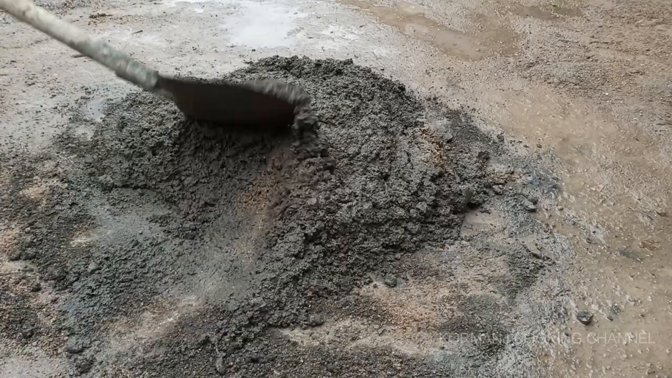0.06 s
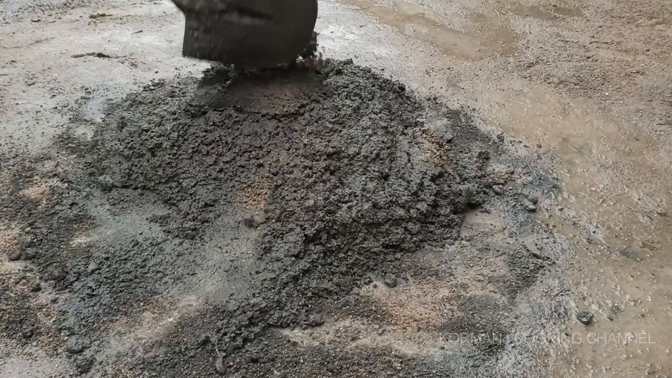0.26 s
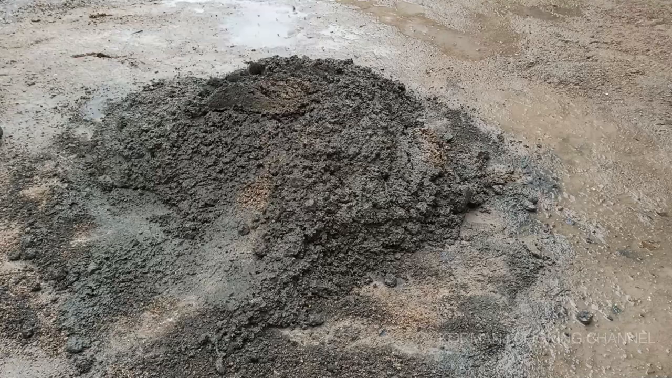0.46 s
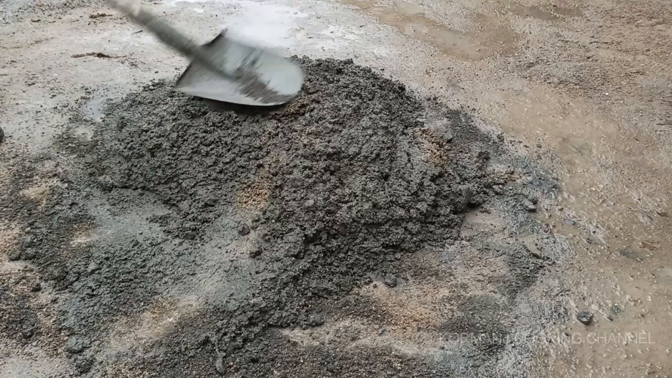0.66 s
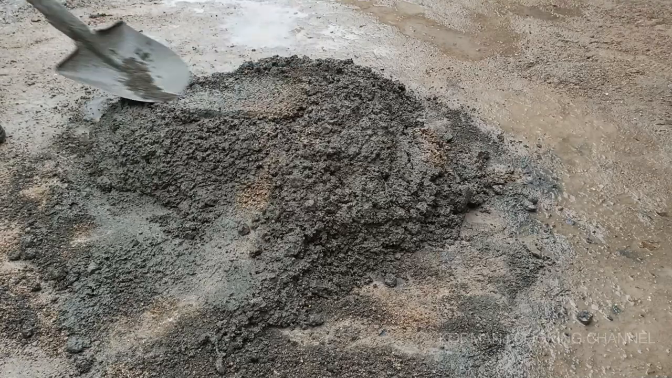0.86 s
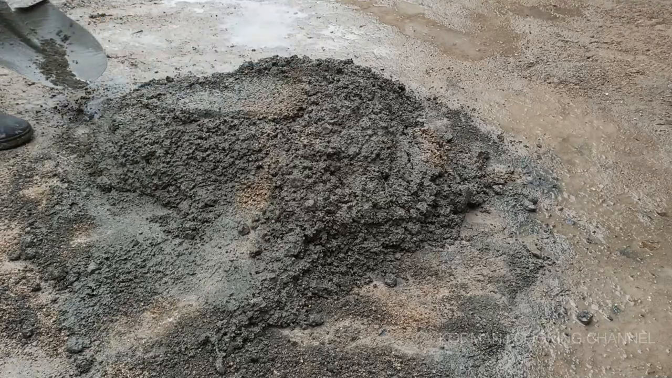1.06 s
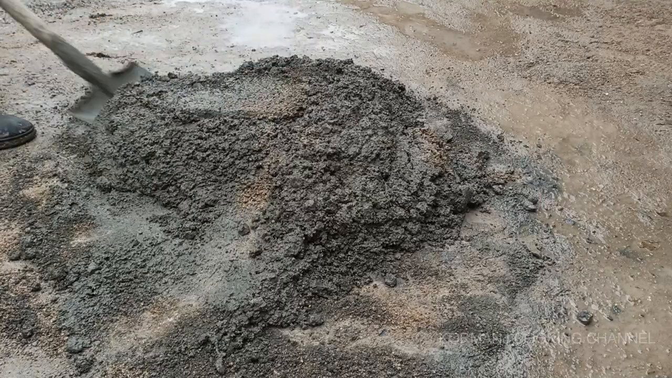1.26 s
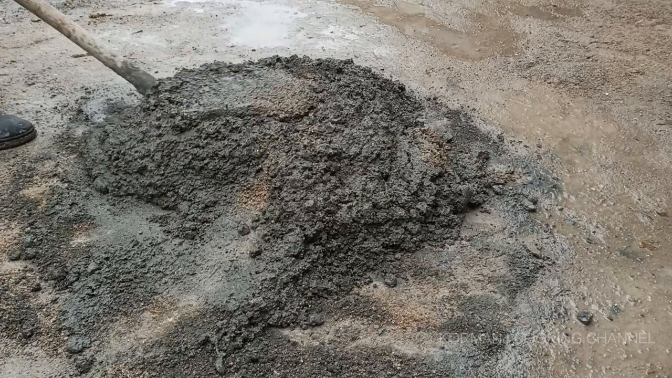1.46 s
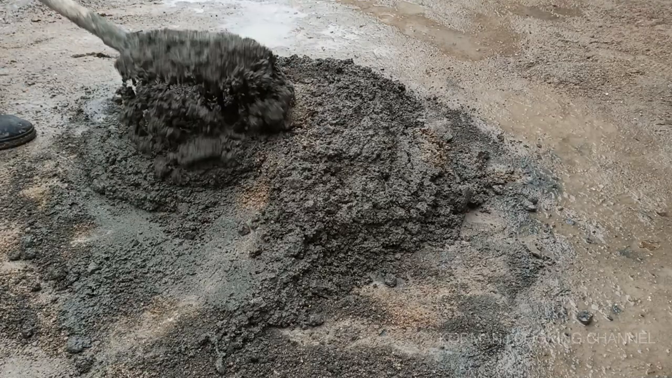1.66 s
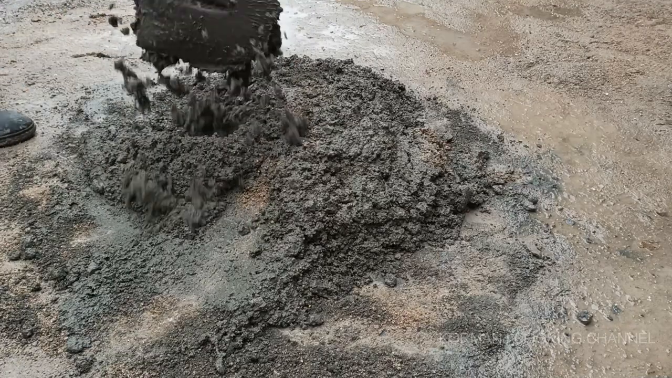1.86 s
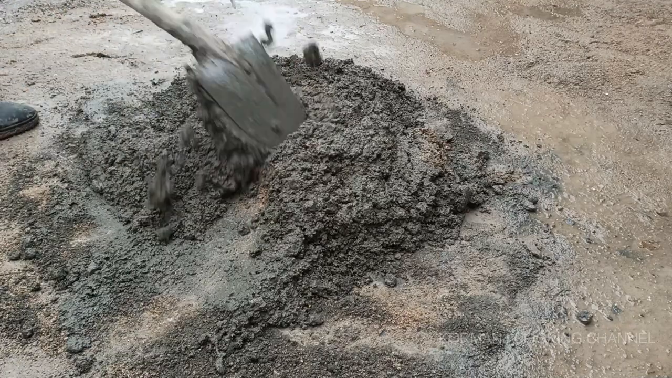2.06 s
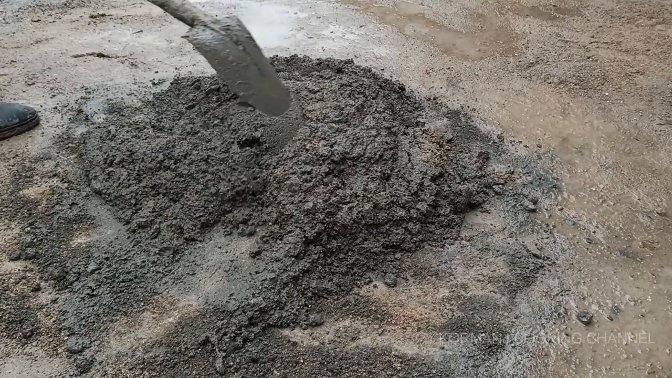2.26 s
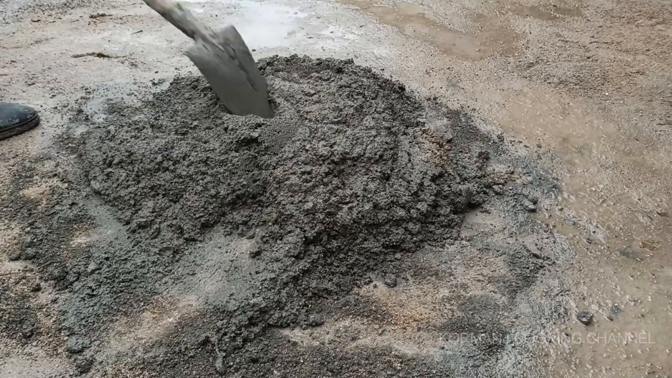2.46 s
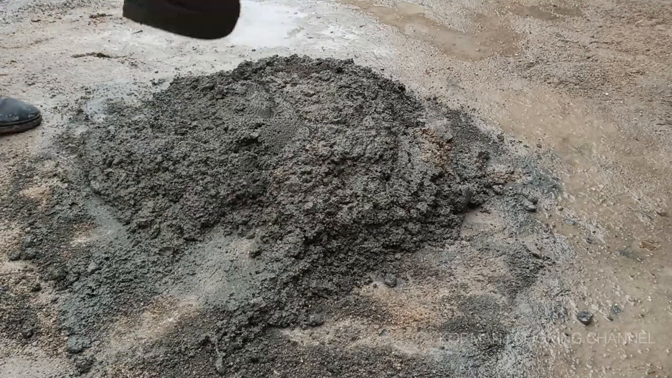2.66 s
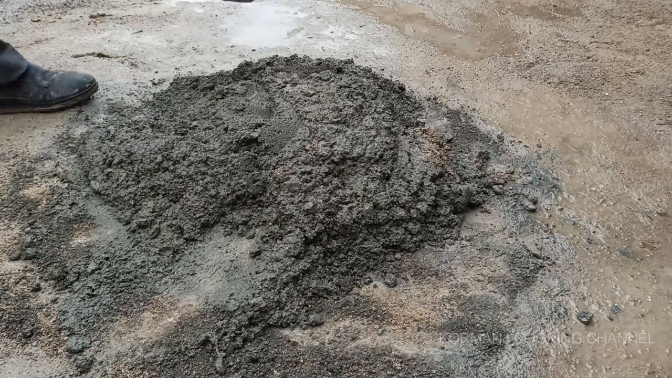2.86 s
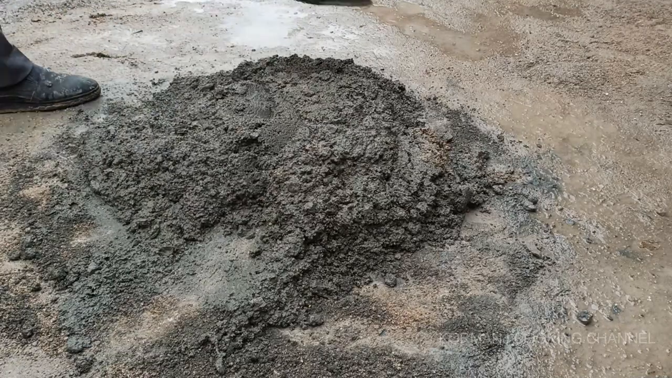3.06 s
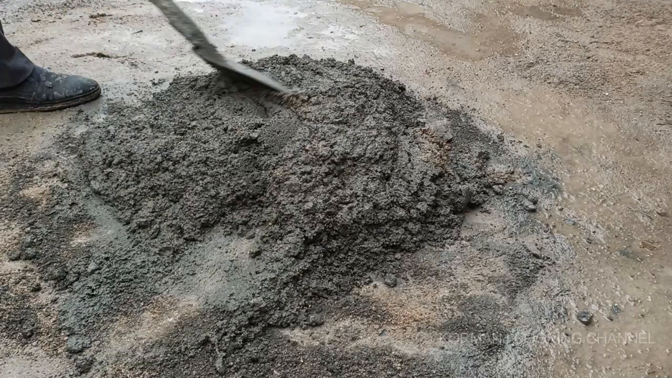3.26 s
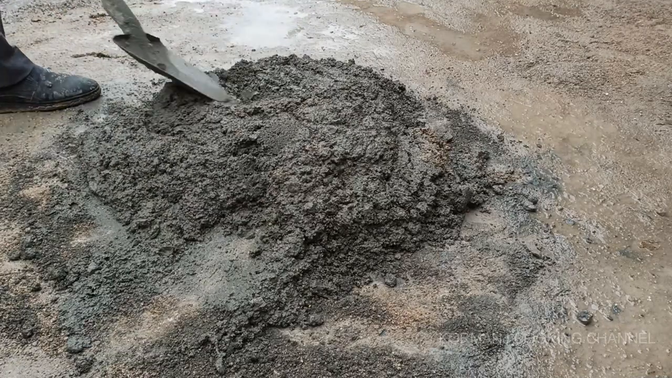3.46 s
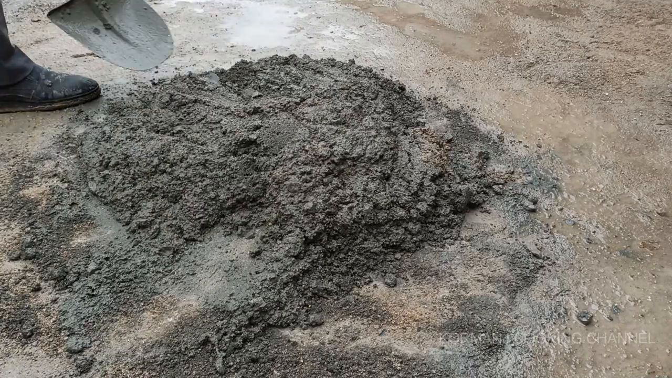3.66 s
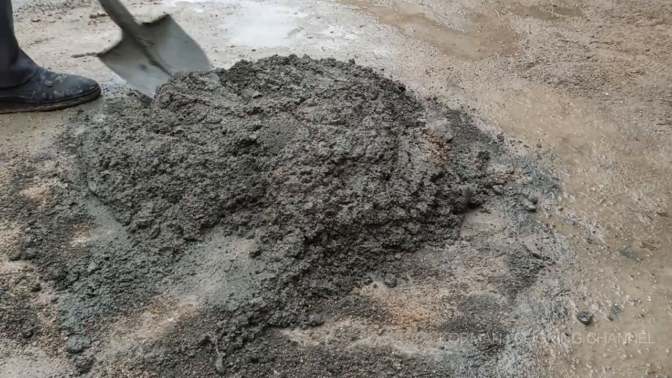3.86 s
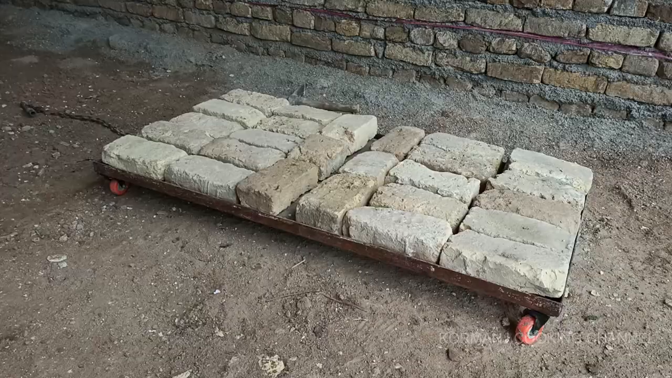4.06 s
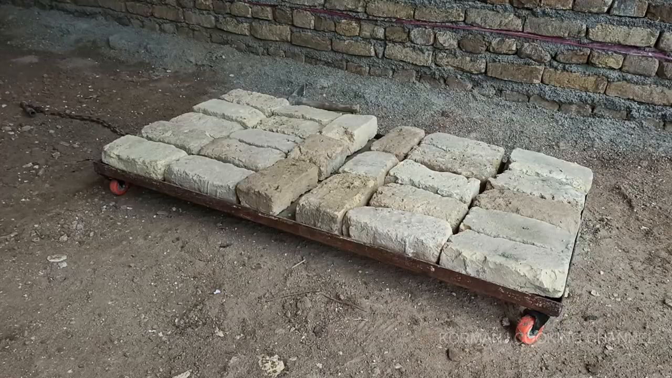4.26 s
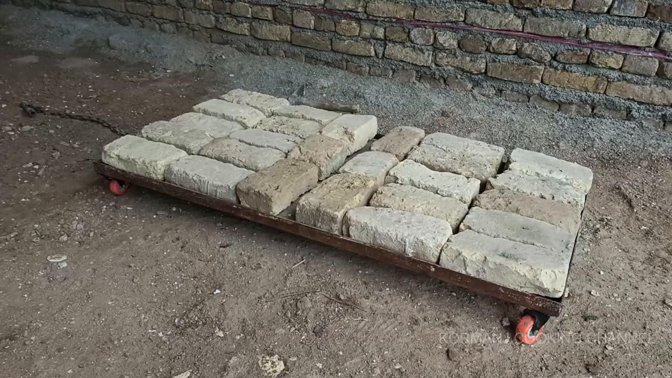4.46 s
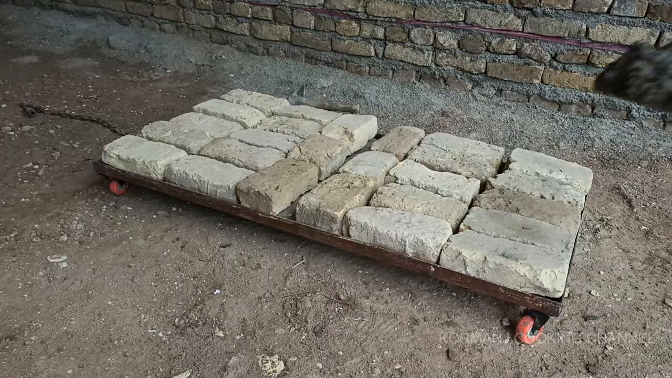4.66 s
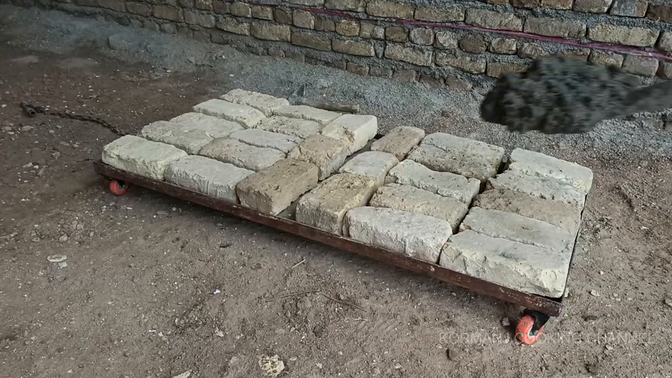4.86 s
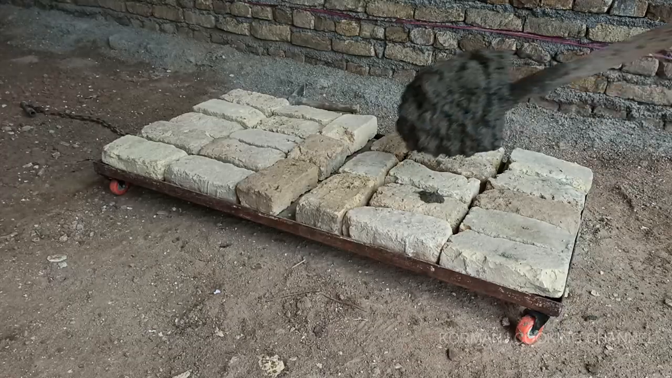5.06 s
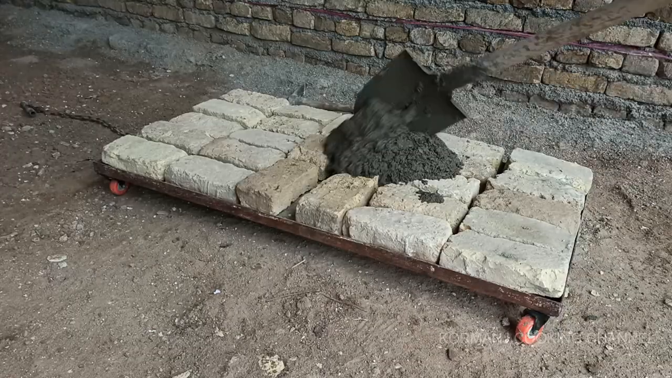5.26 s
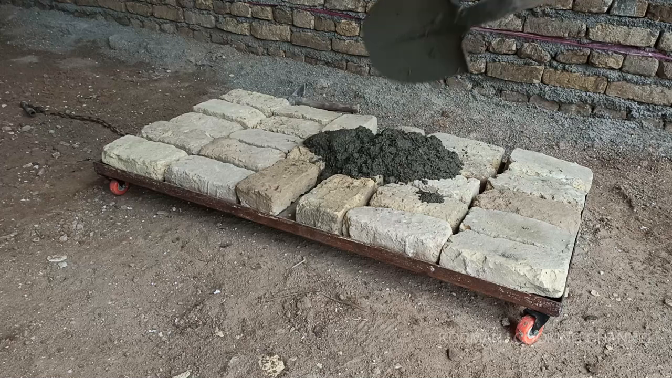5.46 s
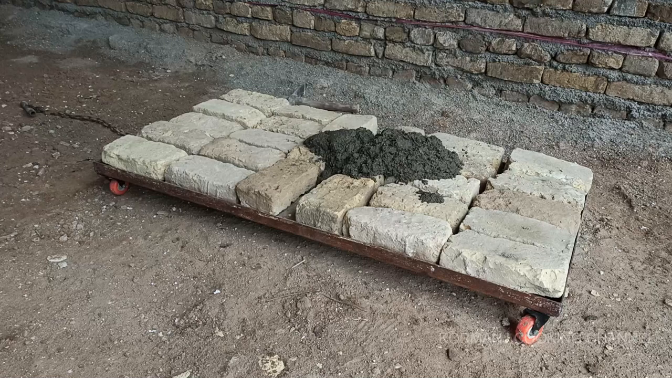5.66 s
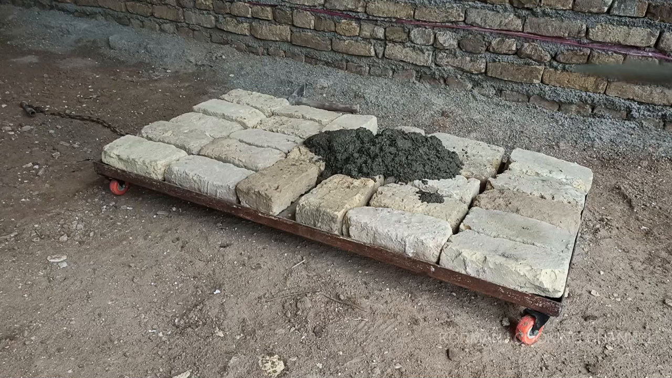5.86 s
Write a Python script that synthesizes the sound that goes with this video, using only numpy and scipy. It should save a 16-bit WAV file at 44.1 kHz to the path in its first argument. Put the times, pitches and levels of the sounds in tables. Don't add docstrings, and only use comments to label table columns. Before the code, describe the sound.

Outdoors in an open yard, a steel shovel works wet concrete close to a stereo microphone: faint shedding grit, a sharp pat, a heavy crunching scoop, softer pouring and chopping, a hard slap and a rough deep dig. The scene cuts to a brick wall, where a stone clacks and the load plops down over a faint unsteady hum.

```python
import sys
import numpy as np
from scipy import signal
from scipy.fft import rfft, irfft, next_fast_len
from scipy.io import wavfile
from scipy.ndimage import uniform_filter1d, map_coordinates

SR = 44100
rng = np.random.default_rng(int(sys.argv[2]) if len(sys.argv) > 2 else 0)


def dump(signal):
    limited = np.clip(np.atleast_2d(signal).T, -1, 1)
    pcm = np.round(limited * 32767).astype(np.int16)
    wavfile.write(sys.argv[1], SR, pcm)


def gain_from_decibels(decibels):
    exponent = np.asarray(decibels, float) / 20
    return 10 ** exponent


N = 261072
TOP_HZ = 15800


def unit(x):
    return x / np.sqrt(np.mean(x ** 2) + 1e-20)


def along(points, hz):
    f, v = np.transpose(points)
    return np.interp(np.log(hz + 1), np.log(f + 1), v)


def curves(rows, t):
    s, *cols = np.transpose(rows)
    return [np.interp(t, s, c) for c in cols]


def wobble(rate):
    knots = rng.standard_normal(int(N * rate / SR) + 4)
    return map_coordinates(knots, [np.arange(N) * rate / SR])


def noise():
    return rng.standard_normal((2, N))


def filtered(x, response):
    m = next_fast_len(N + SR // 2)
    return irfft(rfft(x, m) * response(np.fft.rfftfreq(m, 1 / SR)), m)[..., :N]


def coloured(points):
    return lambda f: gain_from_decibels(along(points, f))


def modes(table):
    def response(f):
        return sum((-1) ** k * gain_from_decibels(db) * 1j * f * w / (c * c - f * f + 1j * f * w)
                   for k, (c, w, db) in enumerate(table))
    return response


# frequency in Hz, level in dB per Hz.
YARD_COLOUR = [(20, -42), (40, -23), (70, -7.5), (150, -3), (400, -4), (1000, -17.5), (3000, -24),
               (8000, -18), (16000, -18.5)]
# time in seconds, level in dB.
AIR = [(0, -48.5), (1, -48), (2, -45.5), (2.8, -51.5), (3.6, -49.5), (4.3, -49), (5, -52), (5.92, -49)]
# frequency in Hz, width in Hz, level in dB.
HUM = [(94.9, 3.2, -62), (205, 4.2, -61.5), (297.8, 14.5, -53.5)]


def yard():
    wall_s = 4.13
    air_db = curves(AIR, np.arange(N) / SR)[0] + 0.53 * wobble(2.0)
    air = gain_from_decibels(air_db) * unit(filtered(noise(), coloured(YARD_COLOUR)))
    hum = sum(gain_from_decibels(db) * unit(filtered(noise(), modes([(hz, width, 0)]))) for hz, width, db in HUM)
    hum = filtered(hum, lambda f: f ** 2 / (f ** 2 + 60 ** 2))
    return air + (np.arange(N) > wall_s * SR) * hum


# start in seconds, peak in dB.
SNAPS = [(0.4324, -47), (0.691, -58), (1.111, -52), (2.8265, -49), (3.0744, -50), (3.5623, -54),
         (3.795, -48), (3.8447, -52), (4.322, -52), (4.5376, -56), (5.691, -52)]


def snaps():
    treble_hz, t60_s = 5000, 0.0088
    out, t = np.zeros((2, N + SR)), np.arange(SR // 50) / SR
    for s, db in SNAPS:
        burst = gain_from_decibels(db + 23 - 60 * t / t60_s) * rng.standard_normal((2, len(t)))
        out[:, round(s * SR):][:, :len(t)] += burst
    return filtered(out[:, :N], lambda f: (1j * f / (treble_hz + 1j * f)) ** 2)


# start in seconds, length in seconds, pitch in Hz, level in dB.
SQUEAKS = [
    (2.599, 0.045, 1645, -46.5),
    (2.603, 0.057, 1090, -52),
    (3.11, 0.057, 4770, -62),
    (3.156, 0.09, 730, -49.5),
]


def squeaks():
    t, out = np.arange(N) / SR, np.zeros(N)
    for s, span, hz, db in SQUEAKS:
        edge = np.clip(np.minimum(t - s, s + span - t) / 0.0091, 0, 1)
        out += gain_from_decibels(db) * edge * np.sin(2 * np.pi * hz * t)
    return out


# start in seconds,
# peak in dB, pitch in Hz, t60 in seconds.
POPS = [(1.119, -29, 1010, 0.026), (1.908, -34, 205, 0.11), (2.126, -22.5, 194, 0.052),
        (2.74, -43, 924, 0.087), (3.741, -22, 1260, 0.023), (3.743, -29, 930, 0.034),
        (4.509, -26, 867, 0.068), (4.535, -35, 962, 0.076), (5.149, -42, 810, 0.097),
        (5.2595, -12, 205, 0.035), (4.2, -31, 338, .05), (4.262, -25, 312, 0.055), (4.674, -28, 298, 0.051),
        (4.77, -22, 188, 0.04)]


def pops():
    rise_s = .003
    out, t = np.zeros(N + SR), np.arange(SR // 5) / SR
    for s, db, hz, t60 in POPS:
        phase = 2 * np.pi * hz * (t + 0.0094 * t * t / t60)
        swell = gain_from_decibels(db - 2.0 - 60 * t / t60) * (1 - np.exp(-t / rise_s))
        out[round(s * SR):][:len(t)] += swell * np.sin(phase)
    return out[:N] * np.array([[1], [0]])


# start in seconds, peak in dB, pitch in Hz, t60 in seconds.
TICKS = [(0.7531, -11, 1060, 0.0031), (2.125, -19, 4370, 0.004), (2.4464, -16.5, 1530, 0.0076),
         (2.828, -30, 5140, 0.0045), (3.0756, -31, 3430, 0.0058), (3.101, -29.5, 1560, 0.0032),
         (3.2542, -11, 2820, 0.0095), (3.251, -20, 1000, 0.014), (3.7938, -50, 4400, 0.0028),
         (3.9513, -14, 3670, 0.0049), (4.4934, -32.5, 1870, 0.0077), (4.7912, -21, 4370, 0.0036),
         (5.2265, -17, 2500, 0.004), (5.2597, -12, 2400, 0.01), (5.3409, -20, 2770, 0.0034),
         (5.2092, -21, 900, .004), (1.1783, -21, 5000, .002), (1.1785, -30, 600, .006),
         (1.221, -27, 6500, .002), (4.7265, -24, 1900, .012), (4.791, -30, 1900, .004),
         (3.2325, -8, 4600, .008), (3.2535, -14, 4200, .008), (3.892, -10, 3500, .01),
         (3.921, -12, 3600, .01), (2.388, -20, 1100, .006), (2.424, -18, 4500, .004),
         (.7445, -18, 2500, .008), (5.399, -15.5, 1870, 0.0061)]
# start in seconds, peak in dB, pitch in Hz, t60 in seconds.
CLACK = [
    (4.7125, -10, 2700, .0035),
    (4.7126, -18, 6300, .003),
    (4.7145, -26, 3400, .01),
    (4.7155, -22, 2000, .012),
    (4.7172, -20, 1000, .008),
]


def ticks():
    out, t = np.zeros(N + SR), np.arange(SR // 50) / SR
    for s, db, hz, t60 in TICKS + CLACK:
        decay = gain_from_decibels(db + 2.5 - 60 * t / max(t60, .001))
        out[round(s * SR):][:len(t)] += decay * np.sin(2 * np.pi * hz * t)
    thin = filtered(out[:N], lambda f: 1j * f / (400 + 1j * f))
    return thin * np.array([[1], [.4]])


# peak time in seconds, level in dB, pitch in Hz,
# length in seconds.
LUMPS = [(1.271, -19, 1432, .011), (1.297, -23, 818, .025), (1.335, -16, 683, .055), (1.385, -27, 105, .08),
         (1.435, -27, 120, .05), (1.359, -19, 560, .025), (1.369, -20, 183, .035), (1.371, -24, 732, .035),
         (1.399, -17, 571, .03), (1.405, -19, 463, .04), (1.405, -21, 764, .03), (1.405, -21, 1184, .03),
         (1.433, -22, 754, .015), (1.433, -25, 1130, .02), (1.439, -15, 431, .024), (1.437, -24, 170, .035),
         (1.458, -22, 388, .04), (1.47, -26, 180, .03), (1.495, -28, 380, .035), (4.112, -33, 180, .04)]
# peak time in seconds, level in dB, pitch in Hz, length in seconds.
CLODS = [(3.893, -23, 409, .015), (3.898, -21, 1733, .026), (3.897, -22, 1389, .015),
         (3.901, -23, 1152, .03), (3.909, -20, 1669, .015), (3.925, -23, 549, .015),
         (3.925, -27, 1109, .04), (3.951, -19, 312, .02), (3.951, -16, 560, .022), (3.95, -18, 743, .035),
         (3.972, -27, 807, .05), (3.971, -24, 538, .04), (3.993, -23, 721, .03), (3.993, -20, 894, .015),
         (3.999, -19, 194, .04), (3.999, -25, 549, .03), (4.017, -27, 678, .04), (4.04, -24, 560, .03),
         (4.055, -24, 183, .05), (4.056, -20, 517, .03), (4.056, -25, 330, .02), (4.056, -27, 760, .02)]
# peak time in seconds, level in dB, pitch in Hz, length in seconds.
KNOCKS = [(0.744, -24, 1626, 0.015), (0.748, -29, 1432, 0.015), (0.752, -27, 721, 0.015),
          (0.752, -31, 904, 0.035), (0.756, -27, 1055, 0.015), (2.125, -31, 1712, 0.015),
          (2.43, -31, 1206, 0.039), (2.442, -28, 1475, 0.015), (2.444, -29, 1292, 0.025),
          (2.444, -28, 1647, 0.035), (3.239, -29, 1604, 0.035), (3.245, -26, 1184, 0.025),
          (3.253, -22, 840, 0.02), (3.253, -23, 1001, 0.015)]


def lumps():
    swell_db, rough_db = -1, 2.5
    out = np.zeros(N)
    for s, db, hz, span in LUMPS + CLODS + KNOCKS:
        count = round(span * SR)
        tone = np.sin(2 * np.pi * hz * np.arange(count) / SR)
        out[round((s - span / 2) * SR):][:count] += gain_from_decibels(db + swell_db) * np.hanning(count) * tone
    return out * gain_from_decibels(rough_db * wobble(140)) * np.array([[1], [.5]])


# start in seconds, peak in
# dB, centre in Hz.
HITS = [(0.1595, -24, 3020), (0.4315, -34, 6510),  (0.7397, -12, 6560), (1.1786, -29.5, 6690),
        (1.2192, -29, 7440), (1.27, -2.5, 6700), (1.9848, -21.5, 7110), (2.5357, -26, 7420),
        (2.9587, -23.5, 6900), (3.2041, -33, 4000), (3.2305, 3, 7000), (3.563, -32, 7100),
        (3.7943, -51, 6900), (3.8889, -0.5, 3600), (3.9953, -1.5, 6400), (4.0332, -5.5, 6750),
        (4.0577, -16, 6770), (4.2614, -38, 6700), (4.3216, -55, 6690), (4.338, -35.5, 6710),
        (4.5378, -35.5, 7340), (5.0659, -37, 5180), (5.5383, -33.5, 6540), (5.6944, -28.5, 7540),
        (5.7139, -22, 6720),
        (0.858, -18, 7300), (0.883, -18, 6800), (0.9254, -14, 6350), (0.9573, -13, 6760),
        (3.9826, -12, 6790), (4.3602, -45, 6770), (4.3871, -42, 4000), (4.3946, -42, 7590),
        (4.4231, -42, 4030), (4.3367, -40, 2500), (4.5383, -40, 2500), (4.658, -38, 3900),
        (4.6899, -37, 4000), (4.7907, -30, 7300), (5.0168, -45, 2500), (5.0752, -42, 4800),
        (5.3979, -18, 2200)]
# start in seconds, peak in dB, centre in Hz,
# low knock in dB re peak, t60 in seconds.
SCUFFS = [
    (0.9241, -17.5, 3790, -37, 0.24),
    (3.6752, -37.5, 4900, -30, 0.063),
    (4.884, -34.5, 4780, -30, 0.054),
    (5.1262, -36, 3930, -26, 0.088),
    (5.722, -20.5, 4540, -43, 0.058),
]
# start in seconds, peak in dB, centre in Hz,
# low knock in dB re peak, t60 in seconds.
CRUMBS = [(2.828, -37.5, 6400, -24, 0.071), (2.8717, -38, 6760, -30, 0.16), (3.0744, -40, 6440, -30, 0.047),
          (3.5683, -34, 7090, -30, 0.14), (3.6546, -43, 6470, -41, 0.16), (3.8387, -43, 6540, -30, 0.057),
          (4.2702, -29, 6730, -35, 0.026), (4.8747, -33.5, 7240, -31, 0.23),
          (5.1217, -31.5, 8050, -30, 0.097)]
# start in seconds, peak in dB, centre in Hz, low knock in dB re peak, t60 in seconds.
SLIDE = (3.5, -39, 5000, -30, 0.4)
# frequency in Hz, width in Hz, level in dB.
BLADE = [(360, 120, 0.5), (481, 132, 1), (574, 69, 0.5), (680, 33, 1), (790, 140, -3.5), (1103, 175, -8)]
# frequency in Hz, width in Hz, level in dB.
GROUND = [(100, 73, -2.5), (181, 37, 11)]


def hits():
    crack_t60_s, stab_rise_s = 0.021, 0.003
    knock_top_db = -28
    cracks, blows = np.zeros((2, N + SR)), np.zeros((2, N))
    t = np.arange(SR // 5) / SR
    sharp = [(s, db, hz, -29 - 0.3 * db, crack_t60_s) for s, db, hz in HITS]
    for s, db, hz, knock_db, t60 in sharp + SCUFFS + CRUMBS + [SLIDE]:
        order = 1 + (t60 > .025)
        band = signal.butter(order, [hz / 1.27, min(hz * 1.37, TOP_HZ)], "band", fs=SR, output="sos")
        shake = rng.standard_normal((2, len(t))) * gain_from_decibels(-60 * t / max(t60, .002))
        shake = shake + .8 * (t == 0)
        shake = shake * np.minimum((t / stab_rise_s) ** 2 + (db < -12), 1)
        cracks[:, round(s * SR):][:, :len(t)] += gain_from_decibels(db + 3.5) * signal.sosfilt(band, shake)
        blows[:, round(s * SR)] = gain_from_decibels(min(db + knock_db - 7, knock_top_db))
    damped = [(c, 3 * w, db) for c, w, db in GROUND + BLADE]
    return cracks[:, :N] + filtered(blows, modes(damped))


# first slip in seconds, last in seconds, slips per second,
# depth in dB.
CHATTER = [
    (3.887, 3.965, 64, 3.5),
]


def chatter():
    t = np.arange(N) / SR
    return sum(depth_db * ((t > a) & (t < b)) * np.cos(np.pi * ((t - a) * rate % 1))
               for a, b, rate, depth_db in CHATTER)


# start in seconds, end in seconds.
TUMBLES = [
    (1.31, 1.48),
    (3.925, 4.07),
]


def damping():
    t = np.arange(N) / SR
    return -3 * sum(np.clip(np.minimum(t - a, b - t) / .015, 0, 1) for a, b in TUMBLES)


# time in seconds, speed as rasp in dB,
# load as blade drumming in dB over the rasp.
SHED = [(0.0, -42, -6), (0.134, -47, -8.5), (0.27, -39, -17), (0.298, -44.5, -12.5), (0.57, -46, -14.5),
        (0.58, -57, -8)]
PAT = [(0.739, -24, -17), (0.743, -18, -14), (0.751, -20, -8), (0.758, -30, -4), (0.91, -30, -12),
       (0.96, -25.5, -19), (0.976, -33, -13), (1.001, -41.5, -23), (1.05, -53, -19)]
SCOOP = [(1.267, -20.5, -14.5), (1.273, -17.5, -7.5), (1.283, -24.5, -7.5), (1.337, -24.5, -1),
         (1.371, -22, -1.5), (1.439, -26, 2.5), (1.471, -31.5, 1), (1.5, -39, 0), (1.55, -52, 0)]
POUR = [(1.55, -48, -2.5), (1.748, -43.5, -16), (1.932, -35, -20.5), (1.992, -41, -6), (2.004, -44, -2),
        (2.022, -36.5, -26), (2.08, -36.5, -31)]
CHOP = [(2.085, -41.5, -7), (2.111, -33.5, -26), (2.127, -28, -4.5), (2.135, -30, -7.5),
        (2.219, -32.5, -19.5), (2.227, -38, -10.5), (2.309, -34, -19), (2.447, -27.5, -5.5),
        (2.452, -37, -5.5)]
PULL = [(2.466, -62, -13), (2.482, -44.5, -8), (2.548, -33.5, -13), (2.594, -33.5, -23.5),
        (2.628, -44.5, -16), (2.69, -51, -25)]
SLAP = [(3.231, -17.5, -12), (3.238, -26, -11), (3.242, -21, -9), (3.248, -27, -11), (3.254, -21, -9),
        (3.263, -26.5, -10), (3.349, -33, -10), (3.451, -45.5, -12), (3.53, -44, -12.5)]
DIG = [(3.886, -26, -2.5), (3.9, -20.5, -9), (3.956, -22, 0), (3.964, -28, 3.5), (3.984, -25, -1),
       (4.064, -33.5, 4.5), (4.082, -35.5, -9.5), (4.17, -57, 12)]
CARRY = [
    (4.716, -42, -2),
    (4.74, -45, 1),
    (4.78, -47, 3),
    (4.818, -46, -7),
    (4.86, -66, 7),
]
TIP = [
    (5.14, -48.5, -5),
    (5.18, -48, -8.5),
    (5.244, -34, -8.5),
    (5.265, -33, -3),
    (5.312, -32, -8.5),
    (5.398, -36.5, -1.5),
    (5.53, -53, -7),
]
# start in seconds, length in seconds, speed in dB, load in dB.
SHIFTS = [(0.692, 0.032, -52.5, -9), (1.125, 0.057, -51, 1), (1.21, 0.11, -46.5, -28),
          (2.714, 0.027, -52, -15), (2.949, 0.042, -51.5, -0.5), (3.105, 0.14, -52.5, -2.5),
          (3.719, 0.032, -56, -5), (4.25, 0.028, -65.5, 12.5), (4.536, .04, -63.5, 6),
          (4.647, 0.079, -57, 9.5), (5.574, 0.11, -50, -27), (5.703, 0.073, -48, -24),
          (5.871, 0.029, -56, 0.5)]


def motion():
    attack_db_per_s, release_db_per_s = 7000, 320
    trickle_db, trickle_load_db = -62, -2
    empty_hz, sink_hz_per_db, usual_db = 630, 32, -30
    layers = [(4.5, 0.0084, 0.0068),
              (2.74, 0.31, 0.065),
              (-1.5, 0.7, 0.0),
              (-8, 1.6, 0.05)]
    t = np.arange(0, N / SR + .01, 1e-3)
    shifts = [[(s, db, load_db), (s + span, db, load_db)] for s, span, db, load_db in SHIFTS]
    rest = [(0, trickle_db, trickle_load_db), (N / SR, trickle_db, trickle_load_db)]
    moves = [SHED, PAT, SCOOP, POUR, CHOP, PULL, SLAP, DIG, CARRY, TIP, rest] + shifts
    speed_db, load_db = np.transpose([curves(rows, t) for rows in moves], (1, 0, 2))
    first, last = np.array([(rows[0][0], rows[-1][0]) for rows in moves]).T[:, :, None]
    speed_db = speed_db - attack_db_per_s * np.maximum(first - t, 0)
    speed_db = speed_db - release_db_per_s * np.maximum(t - last, 0)
    load_db = np.clip(load_db, -25, 12)
    levels = []
    for db, grow, steep in layers:
        each_db = speed_db + db + grow * load_db + steep * (speed_db - usual_db)
        levels.append(20 * np.log10(np.linalg.norm(gain_from_decibels(each_db), axis=0)))
    leading = np.take_along_axis(load_db, speed_db.argmax(0)[None], 0)[0]
    return np.transpose([t, *levels, empty_hz - sink_hz_per_db * leading])


def grains(rate, spread_db, clump_db, bed, patchy_db):
    chance = rate / SR * gain_from_decibels(clump_db * wobble(60))
    size = (rng.random(N) < chance) * gain_from_decibels(spread_db * np.minimum(rng.exponential(size=N), 2))
    crunch = np.sqrt(np.abs(signal.lfilter([1], [1, -.97], size ** 2)))
    z = signal.stft((unit(crunch) + bed) * noise(), nperseg=256)[2]
    field = uniform_filter1d(rng.standard_normal(z.shape[1:]), 4, 0)
    field = uniform_filter1d(field, 8, 1)
    return signal.istft(z * gain_from_decibels(patchy_db * unit(field)), nperseg=256)[1][:, :N]


def hollow(x, rows, width, lift_db):
    hz, t, z = signal.stft(x, SR, nperseg=1024)
    centre = curves(rows, t)[-1]
    gain = 1 + gain_from_decibels(lift_db) / (1 + (np.log((hz[:, None] + 1) / centre) / width) ** 2)
    return signal.istft(z * gain, SR, nperseg=1024)[1][:, :N]


# frequency in Hz, level in dB per Hz.
FINE = [(2500, -22), (4500, -8.5), (6000, 4.5), (16000, -4.5)]
# frequency in Hz, level in dB per Hz.
COARSE = [(500, -37), (1100, 0), (1600, -1), (3500, -1.5), (5000, -0.5), (8000, -31)]


def strokes():
    rows = motion()
    sand_db, stones_db, drum_db, thud_db, _ = curves(rows, np.arange(N) / SR)
    judder = wobble(35)
    slips_db, damped_db = chatter(), damping()
    sand = filtered(grains(1500, spread_db=3.0, clump_db=3, bed=1.8, patchy_db=1.8), coloured(FINE))
    stones = filtered(grains(900, spread_db=3.5, clump_db=3, bed=1.8, patchy_db=2.3), coloured(COARSE))
    drum = filtered(grains(200, spread_db=2.5, clump_db=3, bed=1.2, patchy_db=1.0), modes(BLADE))
    drum = hollow(drum, rows, width=0.5, lift_db=11)
    thuds = filtered(grains(60, spread_db=3, clump_db=3, bed=1.2, patchy_db=1.5), modes(GROUND))
    return (gain_from_decibels(sand_db + slips_db + 0.54 * judder) * unit(sand)
            + gain_from_decibels(stones_db + slips_db + 0.65 * judder) * unit(stones)
            + gain_from_decibels(drum_db + damped_db + 1.2 * judder) * unit(drum)
            + gain_from_decibels(thud_db + damped_db) * unit(thuds))


# time in seconds, left lag in samples, left-right difference in dB.
SIDEWAYS = [(0, -5, -1), (.76, -4, -1), (.95, -8, -.5), (1.27, -11.5, -1.5), (1.45, -12, 0),
            (2.1, -3.5, -.5), (2.6, -4, -.5), (3.2, -1, -1.5), (3.4, -1, -.5), (3.85, -8.5, -1),
            (4.12, -8, 0), (4.2, 16, -1), (4.9, 16, -1), (5.15, 4.5, -2), (5.33, 2, -1), (5.5, 2, -1),
            (5.65, 18, 0), (5.92, 18, 0)]
# frequency in Hz, likeness 0-1.
ALIKE = [(30, 0.55), (130, 1), (350, .96), (700, .89), (1500, 0.76), (3000, 0.48), (6000, 0.25),
         (15000, 0.2)]
# frequency in Hz, left-right difference in dB.
LEAN = [(100, 1), (2500, 1), (6500, 4), (12000, 1.5)]


def ports(pair, aimed=1):
    hz, t, z = signal.stft(pair, SR, nperseg=512)
    hz = hz[:, None]
    lag, left_db = curves(SIDEWAYS, t)
    turn = np.arccos(np.clip(along(ALIKE, hz), 0, 1)) / 2
    tilt = gain_from_decibels((left_db + along(LEAN, hz)) / 2) * np.exp(-1j * np.pi * hz * aimed * lag / SR)
    direct, spread = z[0] * np.cos(turn), z[1] * np.sin(turn)
    left, right = (direct + spread) * tilt, (direct - spread) / tilt
    return signal.istft(np.array([left, right]), SR, nperseg=512)[1][:, :N]


def scene():
    shovel = strokes() + hits() + ticks() + pops() + lumps() + squeaks() + snaps()
    return ports(shovel) + ports(yard(), aimed=.35)


# frequency in Hz, share 0-1.
KEPT_QUIET = [(4700, 1), (5000, .93), (5600, .95), (5900, 1), (8400, 1), (8700, .03), (9900, .04),
              (10500, .18), (11400, .22), (11650, .95), (15700, .88)]
# frequency in Hz, share 0-1.
KEPT_LOUD = [(2500, 1), (2900, .95), (3300, 1), (4800, 1), (5200, .95), (5700, 1), (8400, 1), (8700, .02),
             (9900, .04), (10500, .5), (11400, .55), (11650, .94), (15700, .85)]


def patchy_treble(x):
    hz, t, z = signal.stft(x, SR, nperseg=1024)
    draw = rng.random((len(hz) // 6 + 1, len(t) // 3 + 1))
    draw = draw.repeat(6, 0).repeat(3, 1)[:len(hz), :len(t)]
    level_db = 10 * np.log10(np.sum(np.abs(z) ** 2, axis=(0, 1)) + 1e-12)
    loud = np.clip((level_db + 48) / 22, 0, 1)
    share = along(KEPT_QUIET, hz)[:, None] * (1 - loud) + along(KEPT_LOUD, hz)[:, None] * loud
    keep = np.clip(.5 + (1.02 * share - draw) / .02, 0, 1)
    return signal.istft(z * keep, SR, nperseg=1024)[1][:, :N]


def band_limit(x):
    return signal.sosfilt(signal.butter(12, 16970, fs=SR, output="sos"), x)


# frequency in Hz, level in dB.
MIC = [(20, -5.5), (100, -2), (4750, 1), (4850, -6), (5900, -5), (6800, 5), (7700, 3), (7850, -5.5),
       (8500, -8.5), (8700, -16), (9600, -15.5), (11400, -21), (11600, -10.5), (15700, -5.5)]


def record(dry):
    heard = filtered(dry, lambda hz: gain_from_decibels(along(MIC, hz)) * (hz < TOP_HZ))
    heard = heard / (1 + np.abs(heard / .85) ** 4) ** .25
    mix = patchy_treble(heard)
    return band_limit(mix)


dry = scene()
out = record(dry)
dump(out)
```